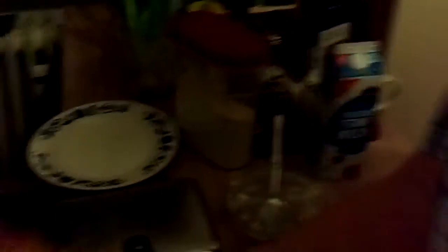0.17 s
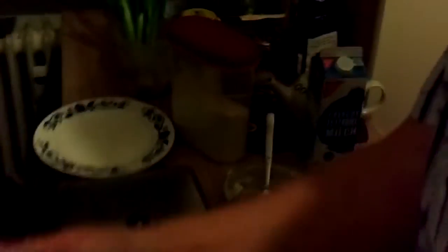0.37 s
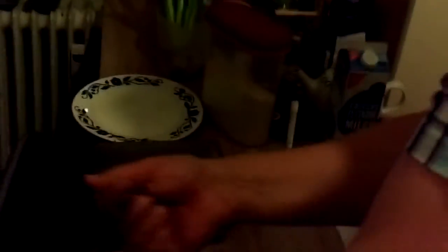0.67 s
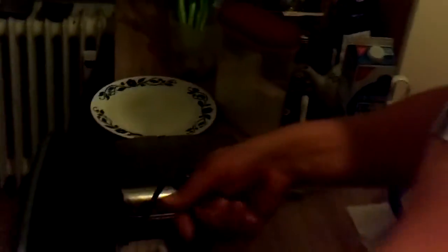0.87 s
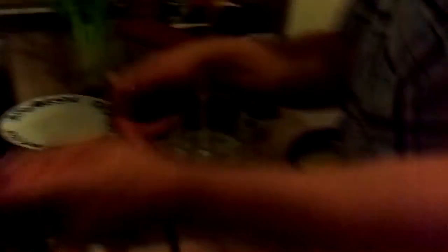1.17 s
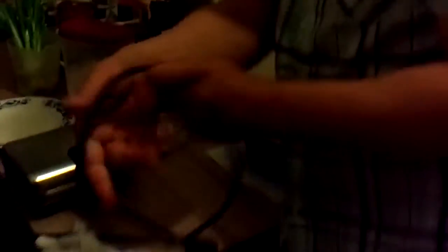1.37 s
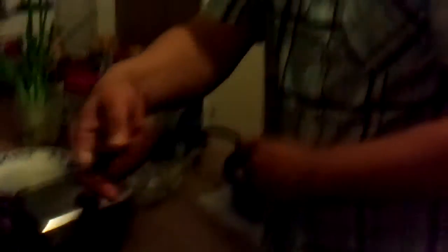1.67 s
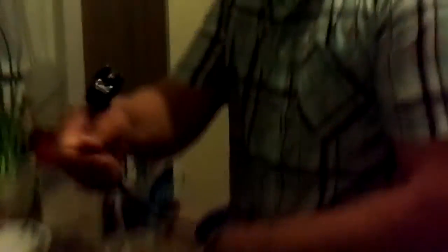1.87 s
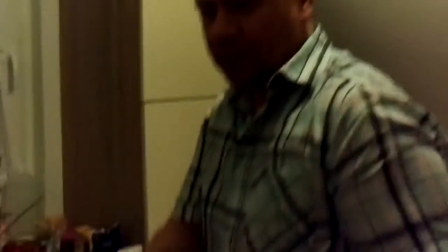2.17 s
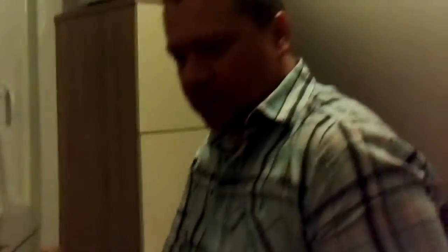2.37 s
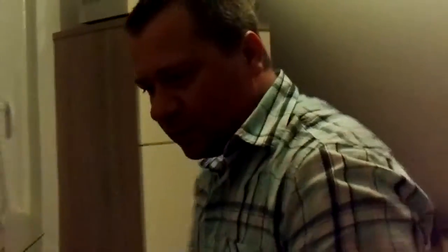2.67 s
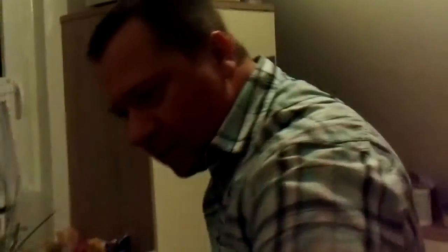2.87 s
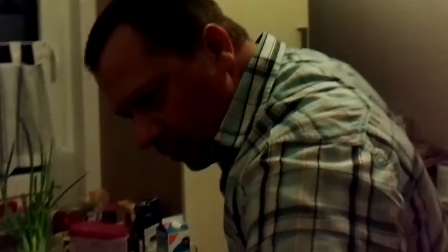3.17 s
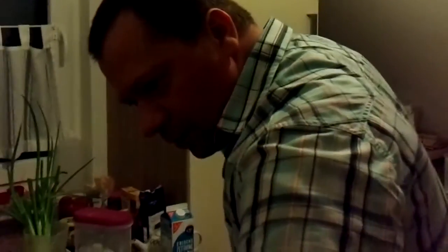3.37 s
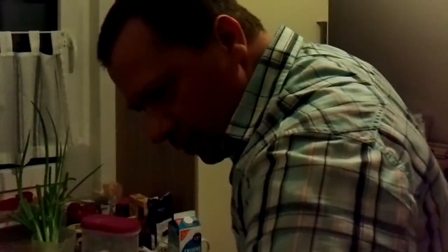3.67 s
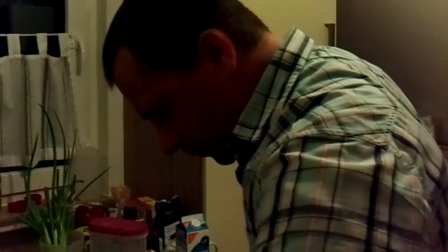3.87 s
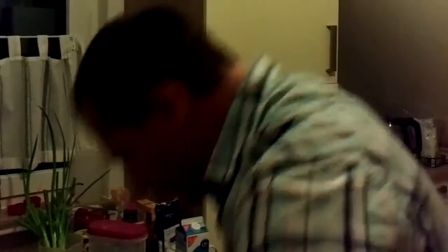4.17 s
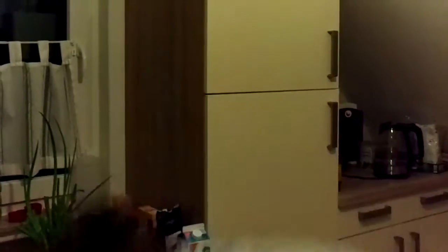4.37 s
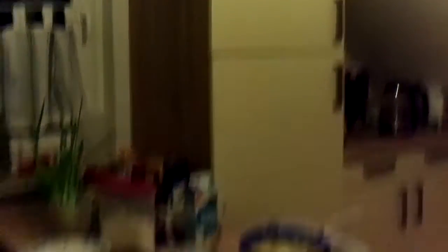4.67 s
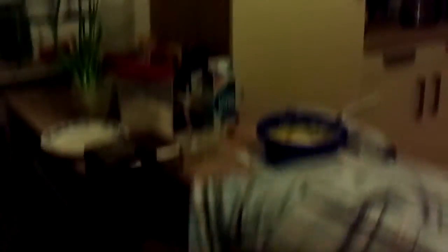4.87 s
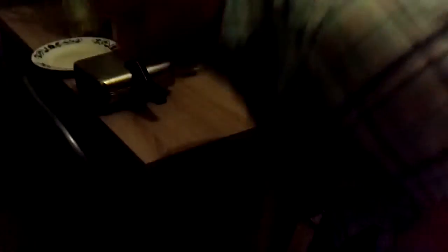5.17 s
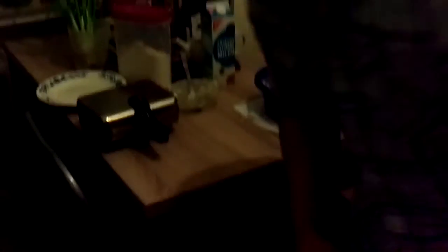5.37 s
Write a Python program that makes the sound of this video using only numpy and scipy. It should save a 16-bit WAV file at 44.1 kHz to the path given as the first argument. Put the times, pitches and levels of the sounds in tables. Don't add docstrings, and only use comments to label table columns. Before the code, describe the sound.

A small, hard-surfaced kitchen is heard close up through a tiny bright microphone, with constant faint hiss and very low mains hum. A light metal knock opens at 0 s over cloth and cable rustle. Faint hollow touches and a shell knock come at 0.3-0.5 s, with soft finger taps and thin squeaks. At about 1.03 s the metal appliance is set down with a hard, sharp clack and brief chirp. Smaller taps follow, then a cable slap at 1.6 s, a clear click at 1.7 s, a stronger slap at 2.5 s and sharp ticks around 3.1 s. After a pause, plug prongs touch a socket at 3.55 s. At 3.93 s comes the loudest, a crisp double snap, then a short slide, hard clicks and a boxy hollow knock until 4.2 s. Near quiet follows; cloth rustles from 4.7 s, with a dull thump and barely audible creaks until 5.5 s.

```python
import sys
import numpy as np
from scipy import signal
from scipy.fft import rfft, irfft
from scipy.io import wavfile

SR = 44100
rng = np.random.default_rng(int(sys.argv[2]) if len(sys.argv) > 2 else 0)


def amplitude_ratio(level_db):
    exponent = np.asarray(level_db, float) / 20
    return 10 ** exponent


def wrap_up_sound(samples):
    columns = np.atleast_2d(samples).T
    tamed = np.clip(columns, -1, 1)
    steps = np.round(tamed * 32767).astype(np.int16)
    wavfile.write(sys.argv[1], SR, steps)


N = 242983

# low f/Hz, high f/Hz, room t60/s, contact length/s, direct level/dB
CONTACT_PARTS = [
    (4880, 8120, 0.27, 0.0011, -1),
    (6870, 9440, 0.18, 0.00021, 5.5),
    (1550, 3490, 0.28, 0.00058, 0.5),
    (450, 1900, 0.3, 0.0011, 0.5),
    (10170, 11000, 0.083, 0.000039, 19),
]
# f/Hz, level/dB, t60/s
TABLE_MODES = [(583, 2, 0.21), (790, 1, 0.04), (960, 2, 0.02), (1332, 6.5, 0.03), (1870, -32, 0.089)]
# f/Hz, level/dB, t60/s
SOCKET_MODES = [(846, 5, 0.067), (889, 0, 0.038), (1223, -2, 0.032), (2070, -9, 0.039), (2600, -15, 0.023),
                (3050, -11, 0.034), (3470, -8, 0.075)]

# snap level/dB, body level/dB, both relative to the tick
SOFT, METAL, CRISP, CABLE = (-16, -19), (-18, -8), (-4, -16.5), (-18, -13)
BRUSH, PRONG, CASE, LATCH = (-13, -12.5), (-11.5, -7.5), (-8, -14), (-30, -10)

# t/s, tick peak level/dB, knock over tick/dB, room level/dB
SOFT_HITS = [(0.4694, -36, -11.5, -8), (0.533, -35.5, -10.5, -7.5), (0.7098, -32.5, -17.5, -16),
             (0.9297, -30, -6, -16), (1.0035, -28.5, -35, -20), (1.2208, -54, 7, -6.5),
             (1.654, -24, -27, -8), (1.9734, -32.5, -8, -3.5), (2.107, -36, -14, -14.5),
             (2.8467, -40.5, -23, -17), (3.0141, -40.5, -16, -16), (3.0945, -16.5, -40, -25.5)]
# t/s, tick peak level/dB, knock over tick/dB, room level/dB
METAL_HITS = [
    (0.0044, -28.5, -12, -12.5),
    (0.0533, -36, -4, -16),
    (0.316, -40.5, -13.5, -3),
    (0.4364, -29, -4, -14),
    (0.963, -35, -17, -9),
    (1.029, -14, -31, -17),
    (1.029, -11, -17, -15.5),
    (1.045, -31.5, 6, -25),
    (2.3236, -35, -16, -25),
]
# t/s, tick peak level/dB, knock over tick/dB, room level/dB
CRISP_HITS = [
    (1.0313, -13, -10, -12),
    (1.4967, -46.5, -14.5, -2.5),
    (1.581, -40.5, -25, -4.5),
    (1.7144, -18, -35, -11.5),
    (1.87, -46, -27, -4),
]
# t/s, tick peak level/dB, knock over tick/dB, room level/dB
CABLE_HITS = [
    (1.6125, -26.5, -25, -12.5),
    (2.5196, -21, -28, -20),
    (2.6024, -27.5, -31, -13.5),
    (3.0897, -24.5, -46, -15),
]
# t/s, tick peak level/dB, knock over tick/dB, room level/dB
BRUSH_HITS = [(0.425, -40, -12, -0.5), (.592, -39, -25, -3.5), (2.062, -34.5, -22, -10),
              (2.702, -45, -22, 6), (3.1485, -41, -14.5, -1)]
# t/s, tick peak level/dB, knock over tick/dB, room level/dB
PRONG_HITS = [
    (3.5513, -20.5, -8.5, -9),
    (3.8634, -55, -4, -23),
    (4.0164, -34, 0, -15.5),
    (4.0811, -16, -16, -18),
    (4.1073, -34.5, -1.5, -11),
    (4.1714, -18, -3, -19),
]
# t/s, tick peak level/dB, knock over tick/dB, room level/dB
CASE_HITS = [
    (3.5654, -30.5, 4, -17),
    (3.7394, -48, -11.5, -6.5),
    (3.93, -33, 1, -31),
    (3.9351, -9, -15, -17.5),
    (4.0554, -43.5, 5, -11),
    (4.0724, -29.5, -12, -2.5),
]
# t/s, tick peak level/dB, knock over tick/dB, room level/dB
LATCH_HITS = [
    (3.932, -4, -48, -27),
    (3.9365, -4, -41, -18),
    (3.9488, -12.5, -20.5, -12.5),
]

# t/s, f/Hz, peak level/dB
THUMPS = [(.055, 326, -45.5), (.13, 330, -51), (0.438, 119, -60), (0.924, 129, -52), (1.028, 206, -35),
          (1.03, 131, -44), (1.035, 386, -41.5), (1.224, 324, -42.5), (1.652, 345, -53),
          (1.721, 298, -51.5), (1.975, 403, -42), (2.7, 128, -66), (3.15, 395, -44), (3.16, 139, -54),
          (3.934, 248, -52), (3.949, 109, -55), (4.169, 304, -47), (4.862, 131, -56)]
# t/s, f/Hz, peak level/dB, t60/s
KNOCKS = [(.3155, 3600, -36, 0.032), (1.221, 760, -47, .12), (1.974, 1300, -47, 0.11),
          (3.933, 3050, -24, 0.064), (.315, 740, -43, 0.026), (.437, 910, -40, 0.13), (.93, 450, -50.5, .1),
          (4.171, 835, -28.5, 0.25), (4.171, 2560, -29, 0.15), (4.172, 1450, -32, .075)]
# t/s, f/Hz, peak level/dB, t60/s
PANEL_RINGS = [
    (.434, 177, -41.5, 0.43),
    (.48, 181, -46, 0.48),
    (1.032, 790, -38.5, .25),
    (4.02, 843, -42.5, 1),
]

# t/s, speed level/dB, pressure/dB (more is duller)
RUBBING = [(0, -42, 3), (.19, -45.5, -4), (.48, -50.5, 9), (.76, -52, -1.5), (.92, -48, 4.5),
           (1.12, -52.5, 0.5), (1.25, -59, -2), (1.85, -51, -4), (2.1, -56, 1.5), (2.5, -52, -2.5),
           (2.8, -55.5, -3.5), (3.58, -64.5, 0.5), (3.77, -61, 1), (3.92, -68.5, 4.5), (4.72, -44.5, -2.5),
           (4.92, -48, -2.5), (5.04, -57.5, -2.5), (5.51, -48, 4)]
# low f/Hz, high f/Hz, level at mean speed/dB, speed exponent/1, pressure exponent/1
RUB_RANGES = [
    (4860, 17000, -52.6, 1.1, 0.01),
    (654, 3270, -57.5, 0.66, 0.87),
    (101, 563, -67.5, 0.25, 1.17),
]
# t/s, length/s, f/Hz, peak level/dB
SQUEAKS = [(0.32, 0.099, 5370, -32), (0.418, 0.037, 5380, -32), (0.927, 0.11, 5070, -36),
           (1.0303, 0.0042, 5230, -4.5), (1.716, 0.076, 7460, -34), (2.515, 0.044, 6160, -32.5),
           (4.08, .004, 5530, -17.5), (4.105, 0.0075, 5320, -22)]
# t/s, length/s, f/Hz, peak level/dB
CREAKS = [(4.855, .065, 2600, -50), (4.98, 0.063, 2570, -58), (5.2, 0.09, 2600, -50), (5.3, .09, 1430, -57),
          (5.455, 0.039, 1416, -49)]

# t/s, level/dB
HUM = [(0.2, -65.5), (1.65, -67), (2.44, -72.5), (3.17, -68), (3.83, -71.5), (5.02, -68.5), (5.4, -69)]
# f/Hz, level per Hz/dB
HISS = [(30, 5.5), (70, -5), (140, -22), (300, -2.5), (1000, -4), (2500, -11.5), (5700, -10), (8500, -7),
        (14000, -14.5)]

AIR_BELOW_SNAP_DB = 33
SOCKET_FLOOR_HZ = 560
THUMP_T60_S = 0.43
THUMP_WIDTH, KNOCK_WIDTH, RING_WIDTH = 0.71, 0.18, 0.12
SQUEAK_WIDTH, CREAK_WIDTH = 0.097, 0.025
MEAN_SPEED_DB = -53
SLIDE_S, SLIDE_HALF_S, SLIDE_DB, SLIDE_PRESSURE_DB = 4.1, 0.1, -48, 4
HISS_DB, MAINS_HZ = -64, 50
PORT_HZ, PORT_WIDTH_HZ, PORT_DB, CAPSULE_CUT_HZ = 5730, 1060, 17.5, 5520


def contacts(hits, modes, ring_db):
    out, drive = np.zeros(N), np.zeros(N)
    t = np.arange(SR // 3) / SR
    for s, *levels_db, room_db in hits:
        levels_db.append(levels_db[1] - AIR_BELOW_SNAP_DB)
        noise = grains(len(t), spread_db=4.0) * amplitude_ratio(0.8 * drift(290, size=len(t)))
        for k, (low_hz, high_hz, t60, length, direct_db) in enumerate(CONTACT_PARTS):
            burst = np.exp(-t / length) * np.where(t == 0, 2, noise)
            touch = band(burst, low_hz, high_hz)
            direct = amplitude_ratio(direct_db) * touch / np.abs(microphone(touch[:1024])).max()
            echoes = band(noise, low_hz, high_hz)
            onset = 1 - np.exp(-(t / 0.0016) ** 2)
            tail = amplitude_ratio(room_db - 60 * t / t60) * onset * echoes
            piece = amplitude_ratio(levels_db[k]) * (direct + tail / np.std(microphone(echoes[:4096])))
            add(out, s, piece)
            if k in (2, 3):
                add(drive, s, piece)
    for hz, level_db, t60 in modes:
        width_hz = np.log(1000) / np.pi / t60
        out += amplitude_ratio(level_db + ring_db) * resonance(drive, hz, width_hz)
    return out


def coloured(kind, rows):
    snap_db, body_db = kind
    return [(s, db, db + snap_db, db + body_db, db + weight_db, room_db)
            for s, db, weight_db, room_db in rows]


def table_contacts():
    hits = coloured(SOFT, SOFT_HITS) + coloured(METAL, METAL_HITS) + coloured(CRISP, CRISP_HITS)
    hits += coloured(CABLE, CABLE_HITS) + coloured(BRUSH, BRUSH_HITS)
    return contacts(hits, TABLE_MODES, ring_db=-0.5)


def socket_contacts():
    hits = coloured(PRONG, PRONG_HITS) + coloured(CASE, CASE_HITS) + coloured(LATCH, LATCH_HITS)
    x = contacts(hits, SOCKET_MODES, ring_db=9.0)
    return signal.sosfilt(signal.butter(4, SOCKET_FLOOR_HZ, "high", fs=SR, output="sos"), x)


def thumps(rows, width):
    out = np.zeros(N)
    t = np.arange(SR // 2) / SR
    for s, hz, peak_db, t60 in rows:
        strike = 1 + 0.99 * np.exp(-t * hz)
        push = rng.standard_normal(len(t)) * amplitude_ratio(-60 * t / t60) * strike
        ring = resonance(resonance(push, hz, width * hz), hz, 2 * width * hz)
        add(out, s, amplitude_ratio(peak_db) * ring / np.abs(ring).max())
    return out


def low_knocks():
    dull = thumps([(*row, THUMP_T60_S) for row in THUMPS], THUMP_WIDTH)
    return dull + thumps(KNOCKS, KNOCK_WIDTH) + thumps(PANEL_RINGS, RING_WIDTH)


def rustle():
    out = 0
    speed_db, pressure_db = in_time(RUBBING)
    slide = np.exp(-((np.arange(N) / SR - SLIDE_S) / SLIDE_HALF_S) ** 2)
    speed_db = 20 * np.log10(amplitude_ratio(speed_db) + amplitude_ratio(SLIDE_DB) * slide)
    pressure_db = pressure_db + SLIDE_PRESSURE_DB * slide
    for low_hz, high_hz, level_db, speed, pressure in RUB_RANGES:
        unevenness = amplitude_ratio(1.5 * drift(12) + 0.27 * drift(200))
        noise = band(grains(N, spread_db=1.5) * unevenness, low_hz, high_hz)
        gain = amplitude_ratio(level_db + speed * (speed_db - MEAN_SPEED_DB) + pressure * pressure_db)
        out = out + gain * noise / np.std(microphone(noise))
    return out


def squeaks(rows, width):
    out = np.zeros(N)
    for s, length, hz, peak_db in rows:
        size, width_hz = round(length * SR), width * hz
        tone = resonance(rng.standard_normal(16384), hz, width_hz)
        tone = resonance(tone, hz, width_hz)[-size:] * np.hanning(size)
        add(out, s, amplitude_ratio(peak_db) * tone / np.abs(microphone(tone)).max())
    return out


def electronics():
    hz = np.maximum(np.arange(N // 2 + 1) * SR / N, 1)
    hiss_hz, hiss_db = np.transpose(HISS)
    colour = np.interp(np.log(hz), np.log(hiss_hz), hiss_db)
    hiss = amplitude_ratio(HISS_DB) * rms_one(irfft(rfft(rng.standard_normal(N)) * amplitude_ratio(colour), N))
    phase = 2 * np.pi * MAINS_HZ * np.arange(N) / SR
    wave = np.sin(phase) + amplitude_ratio(-13.5) * np.sin(2 * phase + 2.0)
    return hiss + np.sqrt(2) * amplitude_ratio(in_time(HUM)[0]) * wave


def microphone(x):
    x = x + amplitude_ratio(PORT_DB) * resonance(x, PORT_HZ, PORT_WIDTH_HZ)
    return signal.sosfilt(signal.butter(2, CAPSULE_CUT_HZ, fs=SR, output="sos"), x)


def resonance(x, hz, width_hz):
    r = np.exp(-np.pi * width_hz / SR)
    zeros = [(1 - r * r) / 2, 0, (r * r - 1) / 2]
    poles = [1, -2 * r * np.cos(2 * np.pi * hz / SR), r * r]
    return signal.lfilter(zeros, poles, x + 1e-18)


def band(x, low_hz, high_hz):
    edges_hz = [low_hz, min(high_hz, .45 * SR)]
    return signal.sosfilt(signal.butter(2, edges_hz, "band", fs=SR, output="sos"), x + 1e-18)


def grains(size, spread_db):
    strength_db = spread_db * np.minimum(rng.exponential(1, size), 4)
    return rms_one(amplitude_ratio(strength_db) * rng.standard_normal(size))


def drift(rate, size=N):
    r = np.exp(-2 * np.pi * rate / SR)
    x = signal.lfilter([1], [1, -2 * r, r * r], rng.standard_normal(size + 4096))
    return rms_one(x[4096:])


def rms_one(x):
    return x / np.sqrt(np.mean(x ** 2) + 1e-20)


def in_time(rows):
    s, *columns = np.transpose(rows)
    return [np.interp(np.arange(N) / SR, s, c) for c in columns]


def add(out, s, piece):
    i = round(s * SR)
    out[i:i + len(piece)] += piece[:N - i]


def scene():
    struck = table_contacts() + socket_contacts() + low_knocks()
    rubbed = rustle() + squeaks(SQUEAKS, SQUEAK_WIDTH) + squeaks(CREAKS, CREAK_WIDTH)
    return (struck + rubbed)[None]


def top_cut(x):
    return signal.sosfilt(signal.butter(12, 13790, fs=SR, output="sos"), x)


def record(dry):
    mix = microphone(dry) + electronics()
    return top_cut(mix)


dry = scene()
out = record(dry)
wrap_up_sound(out)
```